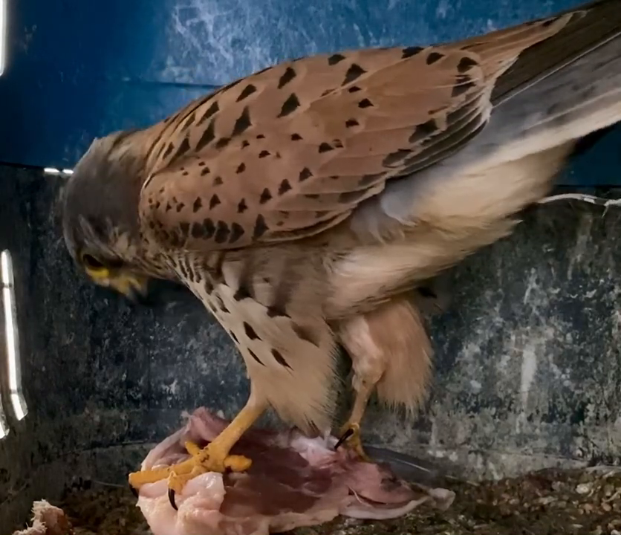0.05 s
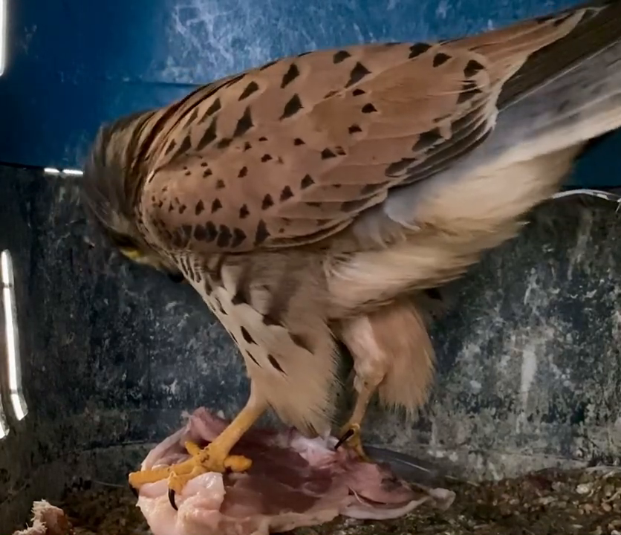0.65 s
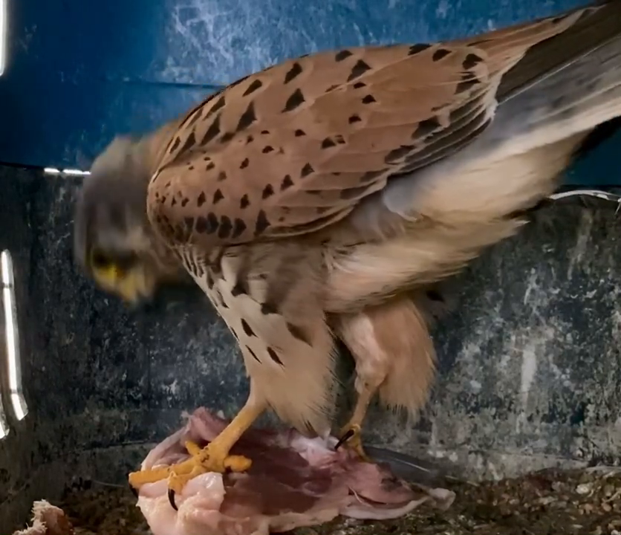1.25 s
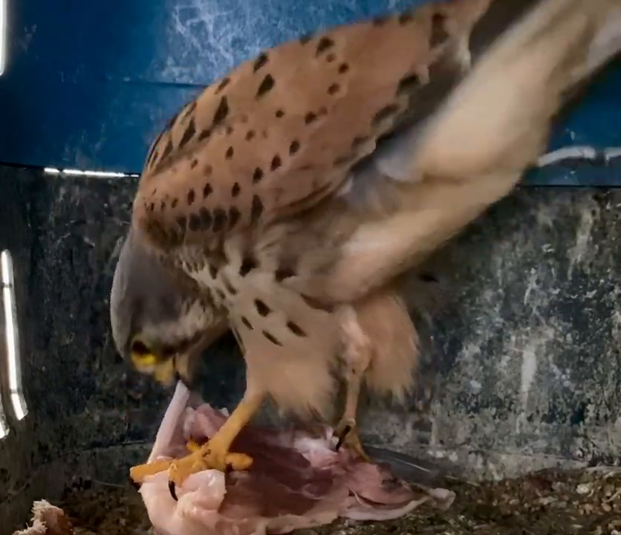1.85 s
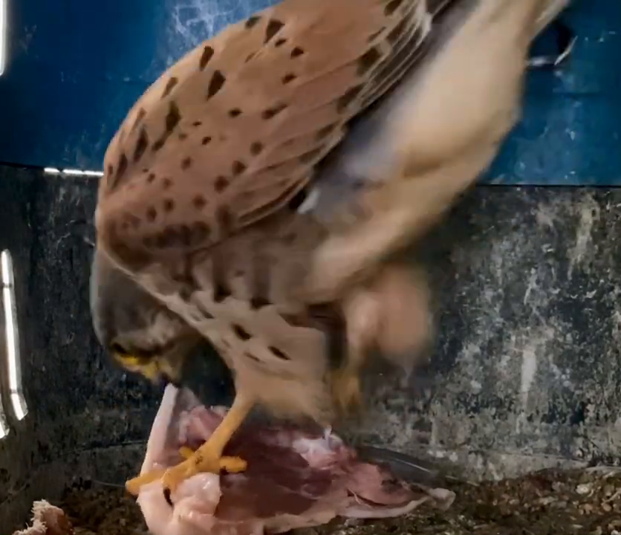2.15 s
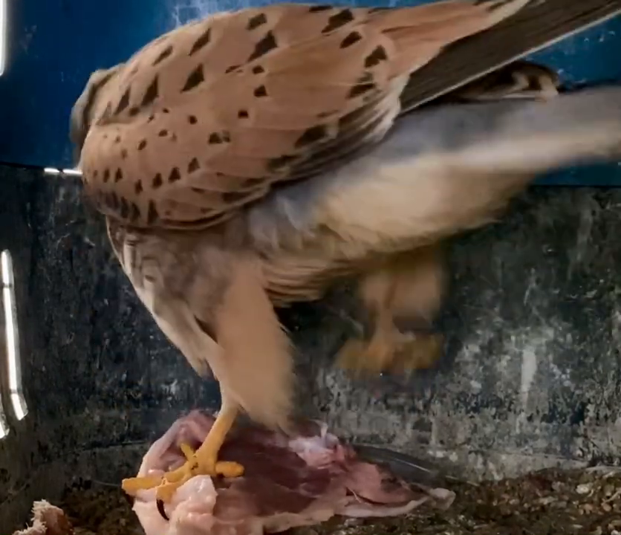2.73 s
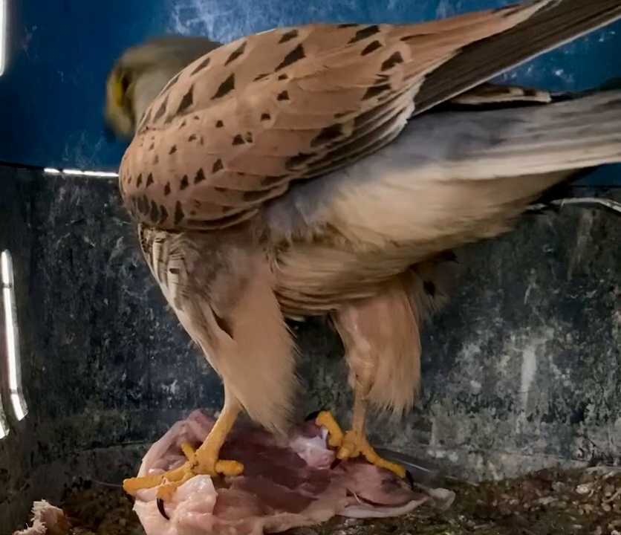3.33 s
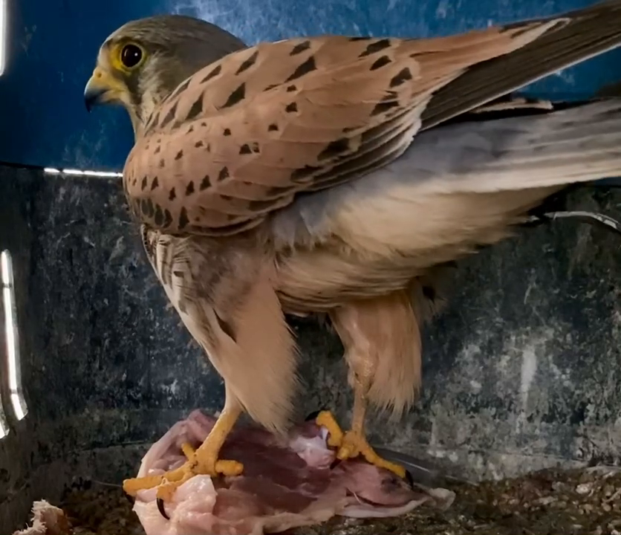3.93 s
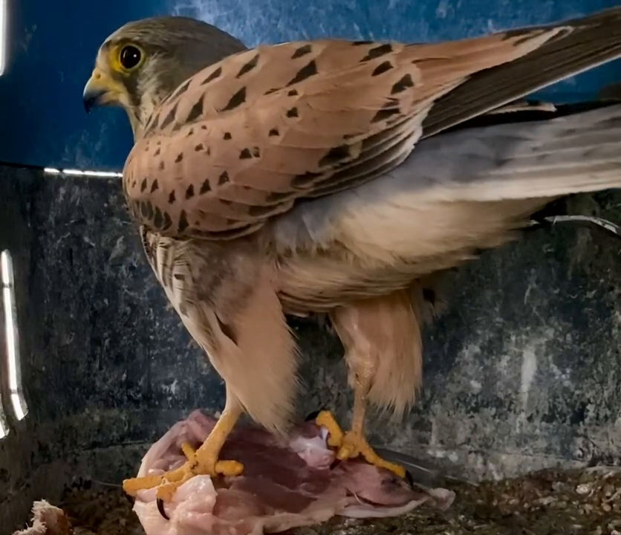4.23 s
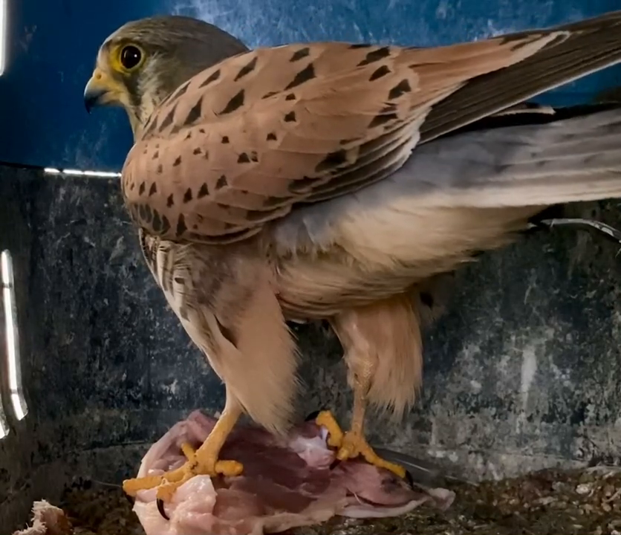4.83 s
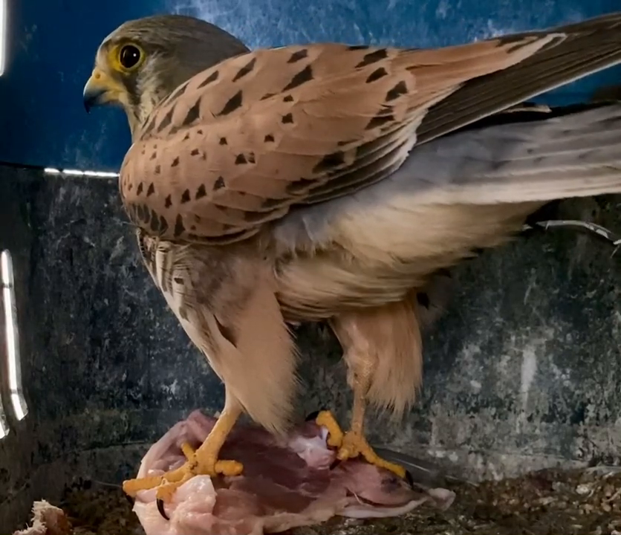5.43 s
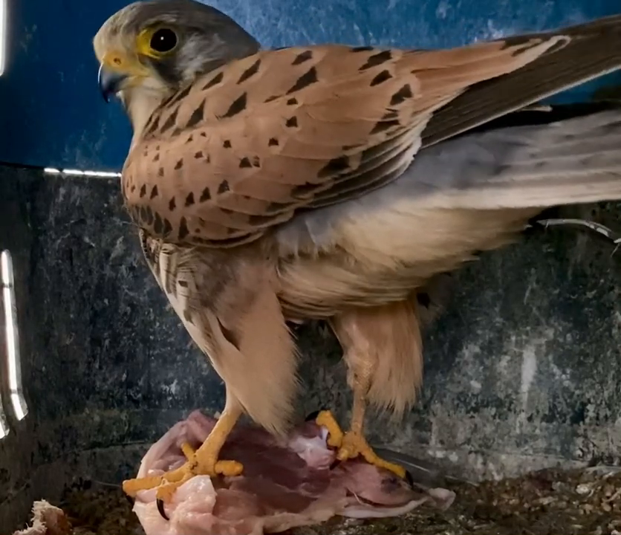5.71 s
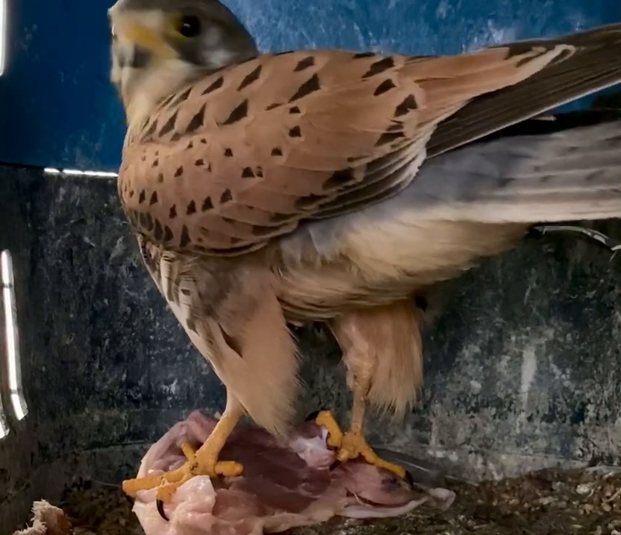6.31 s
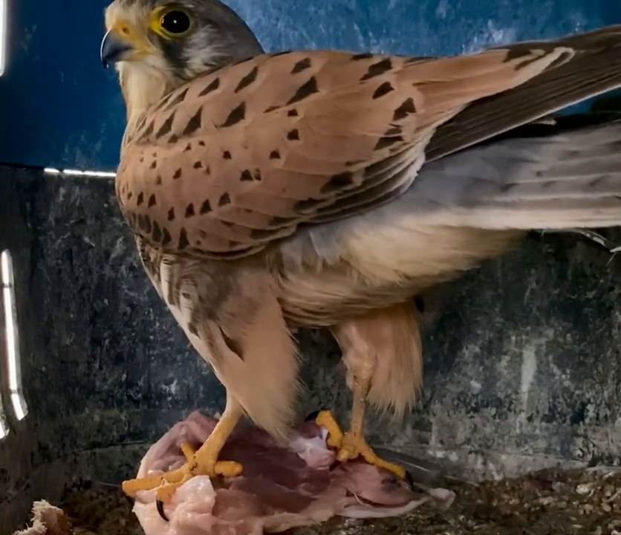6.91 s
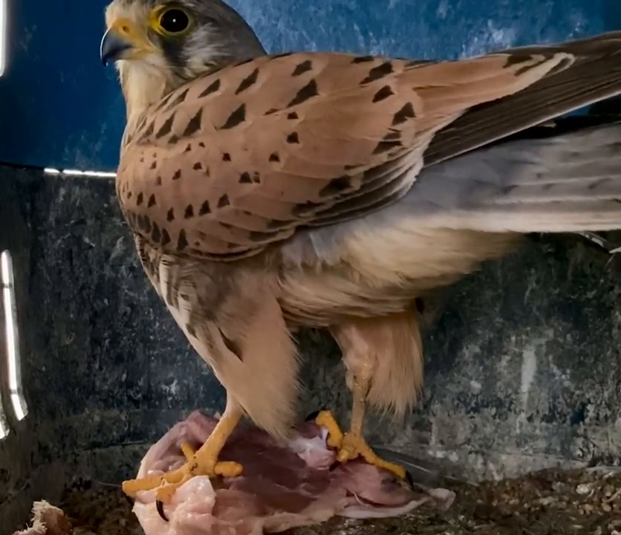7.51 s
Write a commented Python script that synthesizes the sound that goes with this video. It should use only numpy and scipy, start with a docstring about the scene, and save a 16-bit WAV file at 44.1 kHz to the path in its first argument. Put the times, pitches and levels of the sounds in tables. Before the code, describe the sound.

Close wet ripping and snapping as a bird of prey tugs at meat, its plastic tub thudding softly, with a faint distant motor.

```python
"""A kestrel tugs at raw meat in a plastic tub, close by, over an outdoor rumble and a far motor.
Wet fibres crackle, beak and sinew snap, strips rip and the tub thuds; tub and room ring briefly.
From 3 seconds on, something far off whines faintly now and then.
From about 3.5 seconds busier tearing, snaps and thuds follow, probably from a second bird nearby.
The sharpest snaps come just after 5 seconds, and the motor is loudest near the end."""
import sys
import numpy as np
from scipy import signal
from scipy.fft import rfft, irfft
from scipy.io import wavfile
from scipy.ndimage import uniform_filter1d

SR = 44100
rng = np.random.default_rng(int(sys.argv[2]) if len(sys.argv) > 2 else 0)


def pcm_store(signal):
    """Save signal as 16-bit PCM."""
    levels = np.round(np.clip(np.atleast_2d(signal), -1, 1) * 32767)
    wavfile.write(sys.argv[1], SR, levels.astype(np.int16).T)


N = 337806


def undb(db):
    """Turn decibels into a number to multiply by."""
    return 10 ** (np.asarray(db) / 20)


def unit(x):
    """Scale a sound so that its average power is 1."""
    return x / np.sqrt(np.mean(x ** 2))


def unit_energy(x):
    """Scale a sound so that its total energy is 1."""
    return x / np.sqrt(np.sum(x ** 2))


def add(track, start_s, sound):
    """Mix a sound into a track at the given time."""
    start = max(int(start_s * SR), 0)
    track[start:start + len(sound)] += sound[:N - start]


def ring(x, hz, width_hz):
    """Make a sound ring at one pitch; a narrower width rings longer."""
    hz = min(hz, SR * .45)
    return signal.lfilter(*signal.iirpeak(hz, hz / min(width_hz, SR / 4), fs=SR), x)


def keep(x, hz, side, order=2):
    """Keep the "low" or the "high" side of a frequency."""
    return signal.sosfilt(signal.butter(order, min(hz, SR / 2 - 1), side, fs=SR, output="sos"), x)


def colour(x, points, size=4096):
    """Shape a sound's bass and treble along a line of (Hz, dB) points."""
    hz, db = np.transpose(points)
    grid_hz = np.maximum(np.fft.rfftfreq(size, 1 / SR), 1)
    gains = undb(np.interp(np.log(grid_hz), np.log(hz), db))
    # this fold makes the filter ring after a click, never before it
    cepstrum = irfft(np.log(gains))
    cepstrum[1:size // 2] *= 2
    cepstrum[size // 2 + 1:] = 0
    response = unit_energy(irfft(np.exp(rfft(cepstrum))))
    return signal.fftconvolve(x, response)[:len(x)]


def wander(per_s):
    """A smooth random wobble, about 1 in size, with per_s new values a second."""
    step = int(SR / per_s)
    held = np.repeat(rng.standard_normal(N // step + 1), step)
    return unit(uniform_filter1d(uniform_filter1d(held, step), step)[:N])


def fade(t, fade_s):
    """Die away, falling 60 dB in fade_s seconds."""
    return np.exp(-np.log(1000) * t / fade_s)


def swell(t, length, fade_s, rise_s=0.032):
    """Rise, hold until the length is over, then die away."""
    return np.clip(t / rise_s, 0, 1) * fade(np.maximum(t - length, 0), fade_s)


# The tone of the outdoor rumble. Each row: frequency in Hz, relative level in dB.
RUMBLE_COLOUR = [(20, -26), (35, -5.5), (55, 1.5), (80, -2), (120, -8.5), (170, -14), (240, -15),
                 (360, -23.5), (500, -27.5), (700, -31), (1200, -40.5), (2200, -49.5), (6500, -54),
                 (16000, -64.5)]


def rumble():
    """Outdoor air rumbles, alike in both ears in the bass and wide above it."""
    middle, side = (unit(colour(rng.standard_normal(N), RUMBLE_COLOUR)) for _ in range(2))
    side = keep(side, 450, "high", order=1)
    return undb(-56.5 + 0.53 * wander(18)) * np.array([middle + side, middle - side])


# How the motor grows and fades. Each row: time in seconds, relative level in dB.
MOTOR_LEVELS = [(0.0, -49.5), (0.28, -75), (0.3, -74.5), (2.47, -52), (5.93, -51), (6.34, -65), (6.63, -43),
                (7.17, -49.5), (7.32, -40), (7.66, -41.5)]


def motor(hz=64.5):
    """A far motor drones, low and unsteady, with a weak tone an octave higher."""
    db = np.interp(np.arange(N) / SR, *np.transpose(MOTOR_LEVELS))
    phase = 2 * np.pi * np.cumsum(hz * (1 + 0.018 * wander(7.3))) / SR
    drone = np.sin(phase) + undb(-22.5) * np.sin(2 * phase)
    return np.sqrt(2) * undb(db - 1.5 + 1.8 * wander(10)) * drone


def fibres(count, per_s, spread_db):
    """Fibres break with tiny clicks at random moments, mostly small, a few large."""
    breaks = rng.random(count) < per_s / SR
    sizes = undb(spread_db * np.minimum(rng.exponential(size=count), 4))
    clicks = breaks * sizes * rng.choice([-1, 1], count)
    return unit(clicks + 1e-3 * rng.standard_normal(count))


# The tone of wet tearing, shared by snaps and rips. Each row: frequency in Hz, relative level in dB.
WET_COLOUR = [(200, -17.5), (400, -7.5), (560, 2), (950, -10.5), (1300, -3), (1700, -4), (2600, -4),
              (4100, -4), (5600, -4), (7200, -1), (9000, 1), (12000, -2.5), (16000, -9)]
# Tugs at the meat. Each row: start in seconds, length in seconds,
# relative starting level in dB, growth in dB per second.
MEAT_TUGS = [(-.05, 0.066, -50.5, 0), (0.17, 0.56, -72.5, -6.5), (1.26, 0.12, -73.5, -10),
             (1.45, 0.52, -74.5, 11.5), (2.027, 0.36, -71, -2), (2.57, 0.19, -67.5, 1),
             (2.794, .31, -74, 10), (3.705, .11, -58, -8), (3.88, 0.35, -52, -35), (4.26, 0.21, -69.5, 4),
             (4.612, 0.21, -57, -33), (4.87, 0.37, -54.5, -10.5), (5.505, 0.14, -65.5, 112),
             (6.276, 0.26, -60.5, -30), (6.596, 0.029, -59, 0), (6.78, 0.22, -56, -41),
             (7.035, 0.13, -74.5, 70), (7.287, .22, -61, 16)]


def crackle():
    """Stretched meat crackles as each tug tightens or slackens: a fine rustle with a few wet ticks."""
    t, pull = np.arange(N) / SR, 0
    for start, length, db, growth in MEAT_TUGS:
        strain = undb(db + growth * np.clip(t - start, 0, length))
        pull = pull + strain * swell(t - start, length, fade_s=.2)
    rustle = fibres(N, per_s=2800, spread_db=5)
    ticks = fibres(N, per_s=90, spread_db=4)
    flicker = undb(-2.5 + 1.3 * wander(39))
    return pull * flicker * colour(rustle + 0.91 * ticks, WET_COLOUR)


# Snaps of beak and sinew. Each row: start in seconds, relative level in dB, ringing pitch in Hz,
# relative treble in dB, relative body in dB. Small dry breaks are all treble; thick wet ones have body.
SINEW_SNAPS = [(0.0867, -25, 5150, -7, -12.5), (0.1799, -39.5, 4260, -11.5, -13),
               (0.2036, -51, 3900, -19, -4), (0.2555, -48.5, 3850, -35, -5.5), (1.109, -52.5, 7300, 2, -34),
               (1.123, -54, 7600, 6, -31), (1.1467, -52, 8000, 3, -30), (1.17, -53, 5670, -3, -33),
               (1.2782, -55.5, 4240, 2, -26), (1.34, -61, 5760, -5, -22), (1.8882, -48.5, 2820, 1.5, -4),
               (2.164, -46.5, 3900, -7, -11), (2.334, -39.5, 6700, -3, -16.5), (2.581, -47, 6660, 5.5, -40),
               (2.6318, -43, 7250, 7, -38), (3.8624, -33, 2130, -23, -11), (3.8802, -28.5, 3600, -3, -4.5),
               (3.8984, -28, 3820, -23, -2), (3.9095, -31.5, 5730, -29, -8),
               (3.9653, -39.5, 2500, -25, -17), (3.9834, -40, 4080, -21, -4), (4.0107, -40.5, 4300, -7, -7),
               (4.022, -40, 2300, -25, -8), (4.038, -41, 4200, -33, -7.5), (4.1389, -42.5, 5600, -10, -7),
               (4.1808, -32, 2126, -13, -11.5), (4.2268, -40, 2450, -33, -5),
               (4.2764, -44.5, 4800, -10, -2), (4.292, -47, 4700, -16, -13), (4.3163, -44.5, 2340, -30, -1),
               (4.35, -35, 5800, -10, -18), (4.594, -44.5, 5272, -1, -24), (4.6456, -40.5, 5540, -9, -11),
               (4.6916, -35.5, 2940, -20, -12.5), (4.7096, -39.5, 3800, -12, -22.5),
               (4.7751, -36.5, 2840, -9.5, -10), (4.8618, -30, 4896, -10, -22),
               (4.9317, -30.5, 4590, -32, -26), (4.941, -35.5, 4570, -15, -11),
               (4.9731, -31.5, 2710, -17.5, -15.5), (4.9952, -26.5, 4030, -7, -12),
               (5.0419, -40.5, 4677, -28.5, -7), (5.0921, -35, 3470, -19.5, -8.5),
               (5.1186, -13, 3910, -8, -16.5), (5.1361, -10.5, 6930, -2.5, -18.5),
               (5.2132, -22.5, 2800, -10.5, -10.5), (5.556, -34.5, 3800, -10.5, -9.5),
               (5.589, -27.5, 5510, 1.5, -7.5), (5.6046, -21.5, 2850, -4, -14.5),
               (5.6546, -38.5, 2970, -17, -8), (5.7039, -42.5, 3680, -16, -16),
               (5.7691, -27, 6380, -10, -24), (5.957, -39, 2670, -12.5, -10),
               (6.0214, -55.5, 2000, -20.5, -2), (6.103, -64.5, 1500, -25, -2),
               (6.4952, -37, 6360, -5.5, -19), (6.5236, -35.5, 3980, -4.5, -6.5),
               (6.604, -41, 3935, 0, -29), (6.6702, -46.5, 6660, -11, -44), (6.7023, -46, 3900, -8, -44),
               (6.76, -45.5, 2294, -18, -16), (6.8608, -34.5, 3932, -25, -11.5),
               (6.904, -30, 4350, -18, -48), (6.9509, -39, 4530, -7.5, -13), (7.0254, -48, 2720, -19, -29),
               (7.222, -26, 4020, -12, -15.5), (7.2473, -28.5, 2380, -5, -10),
               (7.2559, -34, 3870, -8.5, -12), (7.285, -38, 3890, -8, -32), (7.3336, -39, 3905, -19, -18),
               (7.411, -43, 2570, -10, -31)]


def snaps(size=2048):
    """A sharp break and a flurry of smaller ones ring a wet pocket in the meat and nudge the tub."""
    out, t = np.zeros(N), np.arange(size) / SR
    for start, db, ring_hz, treble_db, body_db in SINEW_SNAPS:
        flurry = unit_energy(fibres(size, per_s=6000, spread_db=6) * fade(t, fade_s=0.005))
        crack = colour(signal.unit_impulse(size) + 0.71 * flurry, WET_COLOUR)
        pocket = undb(-1.5) * unit_energy(ring(crack, ring_hz, ring_hz * .33))
        middle = unit_energy(keep(keep(crack, 2100, "high"), 7340, "low", order=4))
        treble = undb(treble_db + 10.5) * unit_energy(keep(crack, 10000, "high", order=4))
        body = undb(body_db + 10) * unit_energy(keep(crack, 1100, "low", order=4))
        add(out, start, undb(db + 19) * unit_energy(middle + pocket + treble + body))
    return out


# Longer rips. Each row: start in seconds, length in seconds, relative level in dB, ringing pitch in Hz.
MEAT_RIPS = [(0.298, 0.051, -59, 5500), (0.384, 0.065, -63.5, 5630), (0.544, 0.1, -61, 3100),
             (1.865, 0.069, -58, 5200), (2.08, 0.059, -62.5, 6200), (2.214, 0.12, -56, 6006),
             (3.675, 0.1, -46, 2520), (3.86, 0.076, -38.5, 2330), (4.411, 0.043, -51.5, 10950),
             (4.914, 0.022, -39, 4960), (5.13, 0.035, -51, 2800), (5.595, 0.05, -46, 4420),
             (6.155, 0.024, -69, 2000), (6.214, 0.057, -54.5, 1700), (6.245, 0.073, -45.5, 4300),
             (6.356, 0.014, -49, 4680), (6.391, 0.012, -48.5, 4200), (6.414, 0.038, -51, 11000),
             (6.776, 0.04, -47, 4240), (7.065, 0.046, -48.5, 1880), (7.098, 0.067, -56, 1970),
             (7.197, 0.018, -58, 1540), (7.485, 0.052, -55.5, 4000)]


def rips(pocket_db=-12):
    """A strip gives way: a quick run of breaks swells and dies, ringing the pocket it opens."""
    out = np.zeros(N)
    for start, length, db, hz in MEAT_RIPS:
        count = int(length * SR)
        breaks = colour(fibres(count, per_s=2600, spread_db=3.5), WET_COLOUR)
        pocket = unit(ring(breaks, hz, hz / 2 ** 1.5))
        rip = unit(unit(breaks) + undb(pocket_db) * pocket)
        add(out, start, undb(db) * rip * signal.windows.tukey(count, .8))
    return out


# The notes of the tub's floor and walls. Each row: pitch in Hz, width in Hz, relative level in dB.
TUB_NOTES = [(98, 22, -1), (145, 25, -4.5), (193, 51, -2), (241, 24, -2), (328, 84, -4.5), (528, 27, -5.5),
             (592.6, 150, -3.5), (785, 160, -11), (1250, 280, -13.5), (1720, 300, -28)]
# Thuds and hollow knocks. Each row: start in seconds, length of the push in seconds,
# relative level in dB, favoured pitch in Hz.
TUB_THUDS = [(0.598, 0.046, -49, 263), (1.894, 0.045, -55, 261), (2.235, 0.058, -48, 105),
             (2.702, 0.043, -48.5, 239), (2.985, 0.027, -58, 252), (3.54, .03, -58.5, 246),
             (3.69, 0.066, -33.5, 185), (3.7, 0.04, -42, 367), (3.884, 0.074, -43, 157),
             (3.896, 0.025, -45.5, 566), (4.121, 0.01, -52.5, 257), (5.113, 0.023, -33.5, 300),
             (5.214, 0.013, -51.5, 470), (5.61, 0.021, -46.5, 300), (5.956, 0.013, -54, 750),
             (6.016, 0.0161, -62, 742), (6.103, 0.013, -60.5, 808), (6.213, 0.0084, -48.5, 886),
             (6.22, 0.05, -42, 340), (6.247, 0.032, -39, 203), (6.292, 0.0207, -38.5, 202),
             (6.343, 0.051, -45, 205.7), (7.54, 0.012, -51, 750), (7.539, 0.014, -41, 254)]


def thuds(size=12000):
    """Scuffing pushes ring the tub; the place of each push favours some of its notes."""
    out = np.zeros(N)
    for start, length, db, hz in TUB_THUDS:
        count = min(int(length * SR), size)
        pressure = np.pad(signal.windows.cosine(count) ** 0.92, (0, size - count))
        thud = 0
        for note_hz, width_hz, note_db in TUB_NOTES:
            favour = 1 / np.hypot(1, 2 * (note_hz / hz - hz / note_hz))
            push = ring(pressure * rng.standard_normal(size), note_hz, note_hz * 0.44)
            note = unit_energy(ring(push, note_hz, width_hz))
            thud = thud + favour * undb(note_db) * note
        add(out, start, undb(db + 33) * unit_energy(thud))
    return out


# Swells of the far whine. Each row: start in seconds, length in seconds, starting pitch in Hz,
# relative level in dB, level of the rush next to the tone in dB.
WHINE_SWELLS = [(3.0, 0.062, 507, -61, 0.5), (3.161, 0.15, 507, -62.5, -2), (4.34, .12, 429.5, -56.5, -5.5),
                (4.498, 0.18, 423, -64.5, -3), (7.275, 0.57, 432, -57.5, -7)]
# The whine's overtones: relative levels in dB at two and three times its pitch.
OVERTONES_DB = [-8, -22]


def whine(sink_hz_per_s=44.5):
    """A faint, rough, wavering tone in a soft rush; each swell sinks a little in pitch."""
    out = np.zeros(N)
    waver = 1 + .04 * wander(60)
    flutter = undb(0.96 * wander(30))
    rough = .7 * (wander(140) + 1j * wander(140))  # shakes both loudness and phase
    rush = unit(keep(keep(rng.standard_normal(N), 450, "high"), 1100, "low", order=4))
    for start, length, hz, db, rush_db in WHINE_SWELLS:
        t = np.arange(N) / SR - start
        pitch_hz = (hz - sink_hz_per_s * np.clip(t, 0, length)) * waver
        phase = 2 * np.pi * np.cumsum(pitch_hz) / SR
        tone = np.imag((0.83 + rough) * np.exp(1j * phase))
        for multiple, overtone_db in enumerate(OVERTONES_DB, 2):
            tone += undb(overtone_db) * np.imag(rough * np.exp(1j * multiple * phase))
        out += undb(db) * swell(t, length, fade_s=.35) * (tone + undb(rush_db) * rush)
    return flutter * out


def echoes(decay, apart):
    """Dense echoes, left and right: alike in the bass and the top, partly different in between."""
    shared, left, right = rng.standard_normal((3, len(decay)))
    sides = [keep(keep(side, 520, "high"), 4600, "low") for side in (left, right)]
    return np.array([unit_energy((shared + apart * side) * decay) for side in sides])


def tub_and_room(x, walls_fade_s, room_db, room_fade_s, direct_db, size=16384):
    """A sound arrives directly, then bounces off the tub's walls and dies away in the room."""
    t = np.arange(size) / SR
    out = undb(direct_db) * np.array([x, x])
    # the echoes keep changing at random, so no fixed ringing builds up
    for start in range(0, N, size // 2):
        piece = x[start:start + size] * signal.windows.cosine(size)[:N - start]
        walls = echoes(fade(t, walls_fade_s), apart=1.46)
        room = echoes(fade(t, room_fade_s), apart=1.96)
        room = undb(room_db) * keep(room, 13000, "low", order=1)  # the room swallows the top
        for channel, echo in zip(out, signal.fftconvolve(piece[None], walls + room, axes=1)):
            add(channel, start / SR, echo)
    return out / np.sqrt(1 + undb(direct_db) ** 2 + undb(room_db) ** 2)


def scene():
    """Close tearing and thuds with their echoes, over the distant background."""
    tearing = snaps() + rips() + crackle()
    meat = tub_and_room(tearing, walls_fade_s=.04, room_db=-5.5, room_fade_s=.27, direct_db=-9.5)
    tub = tub_and_room(thuds(), walls_fade_s=.11, room_db=0, room_fade_s=.35, direct_db=4)
    return meat + tub + motor() + whine() + rumble()


# Timing at the microphone's two openings. Each row: frequency in Hz, the left one's lead in radians.
LEFT_LEAD = [(150, 0), (400, -.6), (550, 2.2), (1100, 3.3), (1700, 3), (2050, .3), (3200, 1.1), (4000, .1),
             (7300, -.1), (8700, -3), (9500, -3.4), (10600, -6), (11400, -6.4), (12800, -9.3),
             (13900, -9.8), (14700, -12.5)]
# The left opening faces the beak. Each row: frequency in Hz, how much louder the left is in dB.
LEFT_BOOST = [(400, 0), (1000, 3), (1280, 5.5), (1700, 0.5), (3000, 3.5), (3900, 5), (5000, 6), (5800, 2),
              (8000, 0)]


def record(dry, bottom_hz=28, top_hz=16200):
    """Each opening hears each pitch with its own timing and level; the deepest bass and top are cut."""
    hz = np.fft.rfftfreq(N, 1 / SR)
    lead = np.interp(hz, *np.transpose(LEFT_LEAD))
    boost_db = np.interp(hz, *np.transpose(LEFT_BOOST))
    openings = np.array([undb(boost_db / 2) * np.exp(1j * lead), undb(-boost_db / 2)])
    heard = keep(irfft(rfft(dry) * openings, N), bottom_hz, "high")
    return signal.sosfilt(signal.ellip(8, .2, 70, top_hz, fs=SR, output="sos"), heard)


dry = scene()
out = record(dry)
pcm_store(out)
```